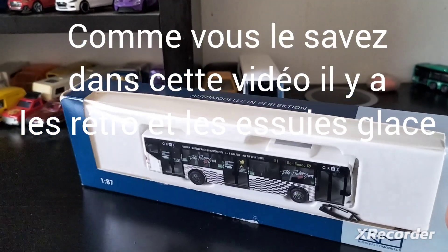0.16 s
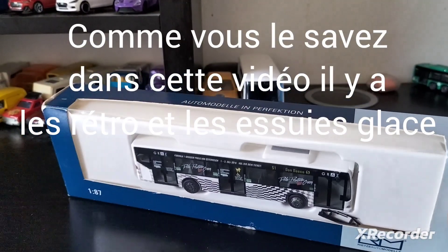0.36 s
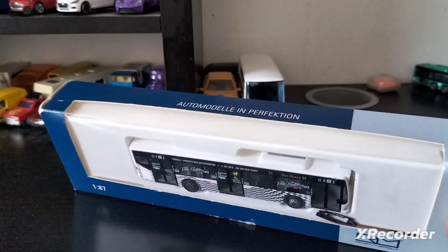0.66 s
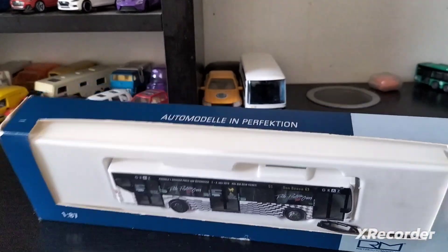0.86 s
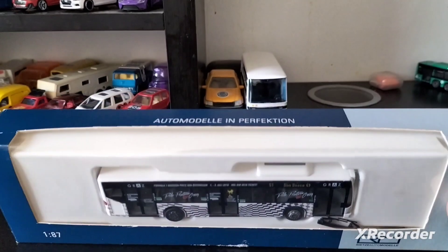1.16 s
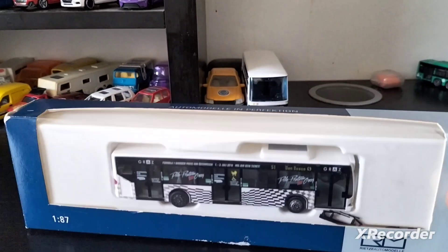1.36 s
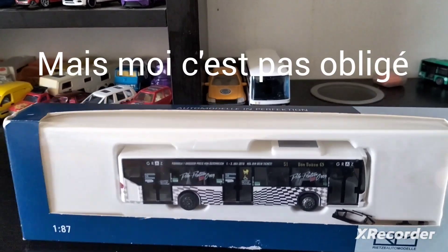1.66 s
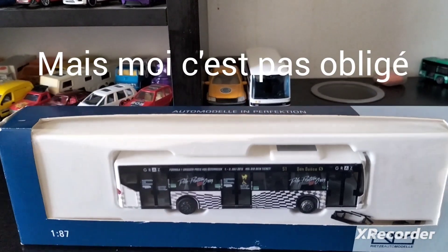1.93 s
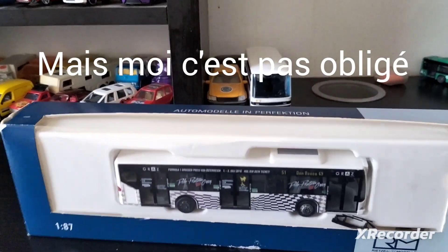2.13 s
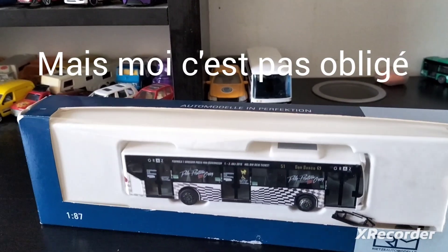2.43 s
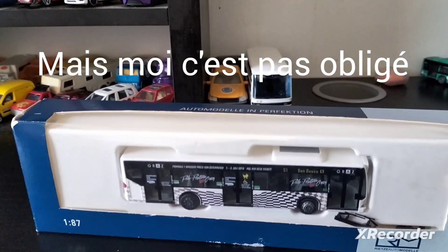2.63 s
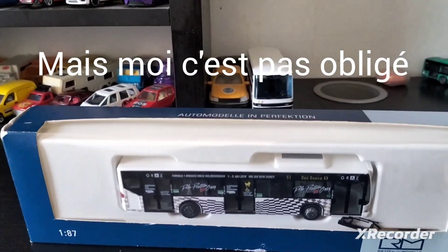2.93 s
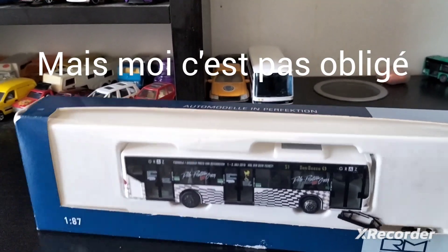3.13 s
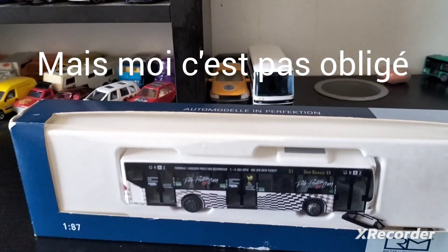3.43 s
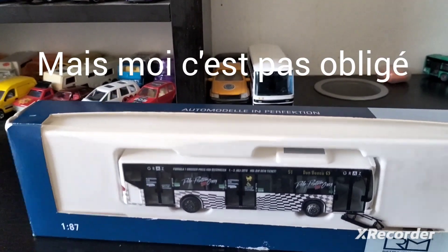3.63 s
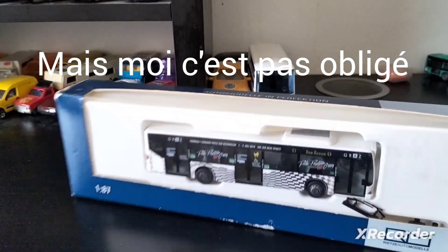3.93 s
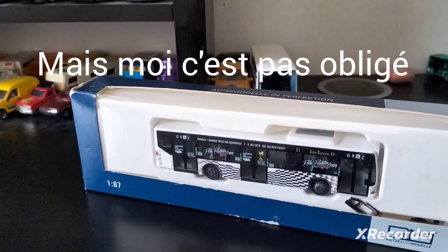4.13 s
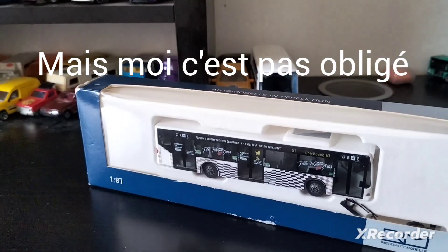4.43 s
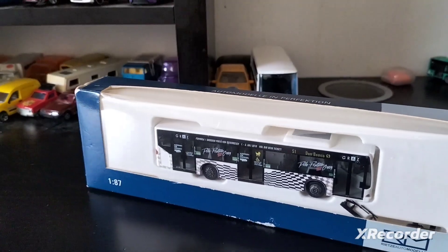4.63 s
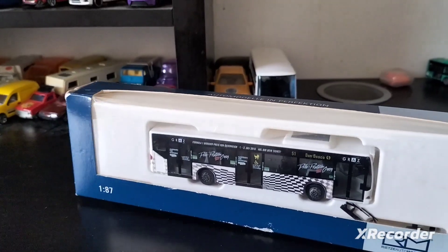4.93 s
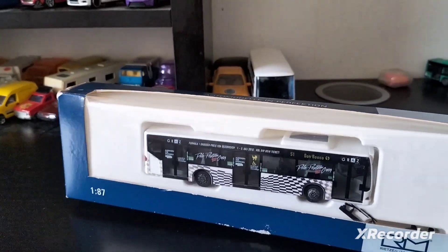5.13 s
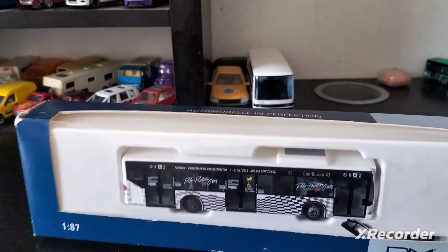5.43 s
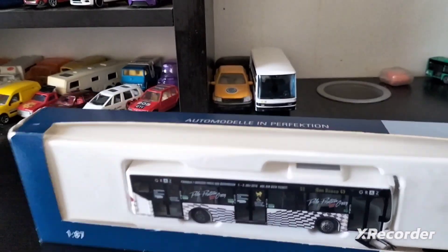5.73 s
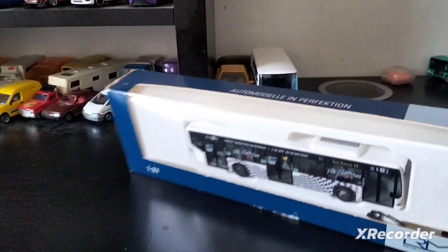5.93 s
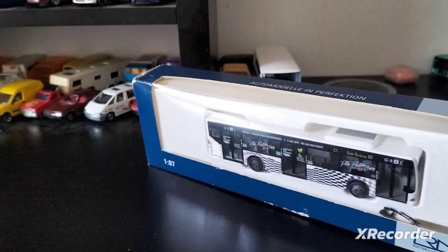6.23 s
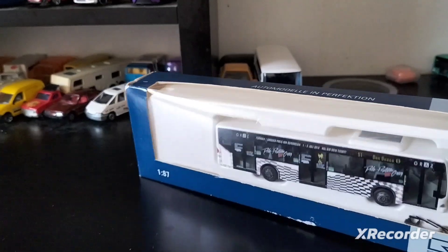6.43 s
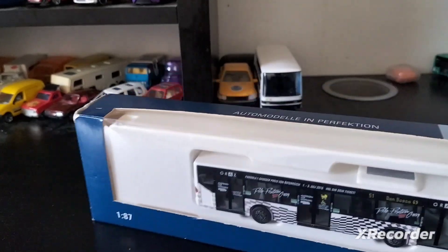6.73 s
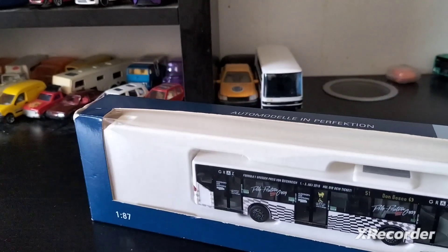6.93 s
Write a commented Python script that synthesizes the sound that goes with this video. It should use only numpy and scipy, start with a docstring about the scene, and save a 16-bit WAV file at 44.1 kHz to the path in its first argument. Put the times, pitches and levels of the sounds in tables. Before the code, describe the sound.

Close, dry handling noise: thin plastic buckles and snaps inside a hollow card box, fingers slide in short strokes, edges scuff. The snaps are strongest around the middle, thin out, then return harder. Near the end a flap lets go with a hard pop and rapid fading creak, followed by zips and a thump. Short room echo, faint room tone, quiet gaps nearly silent.

```python
"""In a small room, a cardboard toy box with a thin plastic insert is handled close to a phone.
The insert snaps and crackles as it flexes, with small bright ticks and clicks: noise and tones that die away.
Card edges scuff and a plastic edge zips in dense runs of tiny slips, with a few dull knocks;
one flap creaks as a row of short pulses, and between them fingers and insert slide over the card.
The box's resonances colour the snaps, scuffs and sliding; a short room echo and faint room tone lie behind."""
import sys
import numpy as np
from scipy import signal
from scipy.fft import rfft, irfft, next_fast_len
from scipy.io import wavfile
from scipy.ndimage import uniform_filter1d, map_coordinates

SR = 44100
rng = np.random.default_rng(int(sys.argv[2]) if len(sys.argv) > 2 else 0)


def waveform_to_disk(signal):
    """Save audio, clipped to [-1, 1], as 16-bit WAV at the path in sys.argv[1]."""
    frames = np.transpose(np.atleast_2d(signal))
    scaled = np.clip(frames, -1, 1) * 32767
    samples = np.round(scaled).astype(np.int16)
    wavfile.write(sys.argv[1], SR, samples)


N = 312228

# the four registers, in order bass, middle, upper, treble: (lowest f/Hz, highest f/Hz)
BANDS = [(20, 550), (550, 1800), (1800, 4500), (4500, 18000)]

# Every snap, scuff and stroke has a level (of its middle register), a body (bass over middle)
# and a brightness (upper register over middle).


def snaps(wall_db=9, tone_db=-15, tone_t60=0.062, ring_t60=0.045, bass_t60=0.087, attack_s=0.0015,
          crackle_db=-20, crackle_t60=0.21):
    """A panel strains, buckles and settles: a brief crunch, many damped modes with one panel tone, then crackle."""
    # sharp snaps of card and insert, though the one at 5.376 s is rather a short scuff: (t/s, level/dB,
    # body/dB, brightness/dB, ringing panel f/Hz)
    snap_list = [(0.076, -52, -18, -2, 1130), (0.111, -53.5, -11, -1, 990), (0.226, -43, -1.5, -8.5, 654),
                 (0.483, -55, -15, -3.5, 1038), (0.646, -62, 0, 1.5, 610), (0.87, -39, -14, -6, 1008),
                 (0.957, -40.5, -10, 4.5, 977), (1.048, -28, -7.5, 8.5, 755), (1.218, -48, -23, -5.5, 1130),
                 (1.297, -54, -17, -9.5, 1093), (1.699, -39, -15, -6.5, 1326),
                 (1.745, -39.5, -5.5, -2, 1005), (1.832, -40.5, -22, -3, 810),
                 (1.869, -43.5, -38, -1, 1030), (1.989, -28.5, -6, -3, 665), (2.079, -34, -14, -3, 1018),
                 (2.142, -35, -15, 0.5, 1540), (2.303, -19.5, -14, -2, 690),
                 (2.447, -39, -15.5, -3.5, 1043), (2.504, -44, -8, -8.5, 990),
                 (2.618, -33, -15.5, -7.5, 957), (2.801, -30.5, -6.5, -3.5, 668),
                 (3.089, -22, -4, -12, 960), (3.278, -45, -19.5, -6.5, 1015),
                 (3.427, -59.5, -10, 0.5, 1014), (3.589, -39.5, -7, -9.5, 1085),
                 (3.884, -33.5, -10, -2, 683), (3.905, -26.5, -6, -18.5, 658), (4.066, -35, -12, 3.5, 1190),
                 (4.107, -29, -14.5, 1.5, 1242), (4.249, -53.5, -14.5, 6.5, 1716),
                 (4.646, -46.5, -15, -4, 1497), (4.743, -37.5, -6, -1.5, 418),
                 (5.087, -60.5, -8.5, 4.5, 975), (5.376, -43.5, -14.5, 0, 893), (5.85, -20, -7, -5.5, 1250),
                 (5.908, -32.5, -6, -4, 995), (6.141, -21, -10.5, 2, 1700), (6.511, -32, -9.5, 3.5, 1650)]
    lead_db, lead_rise_s = -20, 0.003  # straining just before the snap
    crack_db, crack_t60 = 2, 0.0045  # the first instant of a snap
    attack_per_body, typical_body_db = 1.3, -10  # a broad contact lands more slowly than a pointed one
    out = np.zeros(N)
    t = np.arange(-SR // 40, SR // 5) / SR
    after = np.maximum(t, 0)
    for s, db, body_db, bright_db, hz in snap_list:
        dense, bass = rng.standard_normal((2, len(t)))
        ring = band(dense, (550, 18000)) * fade(after, ring_t60)
        ring += band(bass, BANDS[0]) * fade(after, bass_t60)
        ring += amp(tone_db) * np.sin(2 * np.pi * hz * t) * fade(after, tone_t60)
        ring += amp(crack_db) * dense * fade(after, crack_t60)
        landing_s = attack_s * amp(attack_per_body * (body_db - typical_body_db))
        ring *= 1 - np.exp(-after / landing_s)
        before = amp(lead_db) * np.exp(-np.abs(t) / lead_rise_s)
        settling = amp(crackle_db) * fade(after, crackle_t60)
        ring += np.where(t < 0, before, settling) * grains(len(t), rate=680, spread_db=5)
        ring = coloured(ring, lambda f: contact(f, bright_db) + wall_db * walls(f, vary=13.5))
        snap = amp(db) * voiced(ring, registers(body_db, bright_db), window_size=882)
        add(out, s + t[0] + lead_rise_s * 2 / 3, snap)  # the snap breaks 2 ms after its listed time
    return out


def scuffs(wall_db=8):
    """An edge drags or a panel is knocked: a dense run of tiny slips swells and dies."""
    # short scuffs and a few dull knocks: (t/s of the swell's top, level/dB, body/dB, brightness/dB, rise/s)
    scuff_list = [(0.054, -57, 1.5, 4.5, 0.0065), (0.269, -56.5, 3.5, -3.5, 0.016),
                  (0.435, -61.5, 0.5, -25, 0.015), (0.597, -44.5, -4, -12, 0.013),
                  (0.752, -52.5, -1, -18, 0.0089), (0.928, -44.5, -10, -3.5, 0.007),
                  (0.986, -34, 0, -21, 0.0064), (1.047, -28, -4.5, 2, 0.018), (1.16, -36, -7.5, -8, 0.0051),
                  (1.535, -46, -6.5, -3.5, 0.006), (2.155, -46, -16, 2, 0.019),
                  (2.25, -47, -8, -3.5, 0.023), (2.669, -33.5, -14, -4, 0.002),
                  (2.832, -47, -5, -7.5, 0.003), (3.147, -39.5, -14, -14.5, 0.0024),
                  (3.626, -46, -3, -5.5, 0.0051), (4.15, -28.5, 0, -7.5, 0.0082),
                  (4.401, -47.5, -10, -0.5, 0.024), (4.528, -58.5, -3.5, 0.5, 0.044),
                  (4.995, -52, -10, -5, 0.0048), (5.034, -56, -2.5, -6.5, 0.0088),
                  (5.276, -47, -10, 4, 0.014), (5.507, -51, -32, -14, 0.0034),
                  (5.605, -50, -9.5, -10, 0.015), (5.861, -26, -12, -2.5, 0.0015),
                  (5.983, -30, -13, 2.5, 0.014), (6.011, -48, -4, -4, 0.0027),
                  (6.088, -34.5, -16, -6, 0.008), (6.412, -25.5, -21, -5, 0.0052),
                  (6.522, -33, -12, -2.5, 0.01), (6.616, -29, -19, 5.5, 0.0041),
                  (6.658, -21, -0.5, -7, 0.0032), (6.729, -40.5, -6, -3, 0.004),
                  (6.85, -33, 1, -8.5, 0.0064)]
    shortest_fall_s, fall_per_rise = 0.009, 1  # each dies quickly, a slow one a little later
    out = np.zeros(N)
    t = np.arange(-SR // 10, SR // 5) / SR
    for s, db, body_db, bright_db, rise in scuff_list:
        fall = shortest_fall_s + fall_per_rise * rise
        swell = np.exp(-np.abs(t) / np.maximum(np.where(t < 0, rise, fall), 1e-3))
        rasp = swell * grains(len(t), rate=5000, spread_db=0.5)
        rasp = coloured(rasp, lambda f: contact(f, bright_db) + wall_db * walls(f, vary=10.0))
        add(out, s + t[0], amp(db) * voiced(rasp, registers(body_db, bright_db), window_size=441))
    return out


def zips(rise_s=0.002, fall_s=0.013):
    """Very fine, fast slips along a plastic edge: a short sizzle, mostly high above the box's resonances."""
    # a sharp plastic edge zips over the card: (t/s of the top, level/dB)
    zip_list = [(1.05, -39.5), (6.595, -44.5), (6.612, -33.5)]
    # colour of the sizzle: (f/Hz, relative level/dB)
    sizzle_curve = [(2000, -30.5), (5000, -2.5), (7500, 0), (10000, -9.5), (12500, -4.5), (15500, -5)]
    out = np.zeros(N)
    t = np.arange(-SR // 50, SR // 10) / SR
    swell = np.exp(-np.abs(t) / np.where(t < 0, rise_s, fall_s))
    for s, db in zip_list:
        fine_slips = grains(len(t), rate=9000, spread_db=0.5)
        sizzle = unit(coloured(fine_slips, lambda f: along(sizzle_curve, f)))
        add(out, s + t[0], amp(db) * swell * sizzle)
    return out


def pings(t60=0.014, spread=0.16, attack_s=0.0003):
    """A small bright tick: 14 high tones scattered around a centre, dying quickly."""
    # small bright ticks and clicks, some perhaps of the plastic insert: (t/s, peak level/dB, centre f/Hz)
    ping_list = [(0.037, -41.5, 4240), (.05, -37, 4120), (0.079, -38, 4070), (0.112, -41, 3800),
                 (.648, -40.5, 4870), (4.748, -26.5, 5660), (4.812, -42.5, 4210), (5.08, -44, 4500),
                 (5.091, -38.5, 4730), (5.104, -46, 4230), (6.39, -17, 4030)]
    out = np.zeros(N)
    t = np.arange(SR // 20) / SR
    for s, db, hz in ping_list:
        pitches = hz * (1 + spread * rng.standard_normal(size=(14, 1)))
        start_phases = rng.random(pitches.shape)
        ring = np.sin(2 * np.pi * (pitches * t + start_phases)).sum(axis=0) * fade(t, t60)
        ring *= 1 - np.exp(-t / attack_s)
        add(out, s, amp(db) * ring / np.abs(ring).max())
    return out


def creak(first_db=-3, slips_db=-21, width_s=0.00073):
    """A flap sticks and slips: it lets go with one hard pop, then judders along the wall in fading slips."""
    # the one creak: t/s, slips per second, f/Hz, fade time constant/s
    s, rate, hz, life = (6.409, 300, 1364, 0.099)
    t = np.arange(-SR // 200, SR // 200) / SR

    def pulse(pitch):
        """One slip: a few swings of a tone under a smooth bump."""
        return np.cos(2 * np.pi * pitch * t) * np.exp(-(t / width_s) ** 2)

    out = np.zeros(N)
    start = s + t[0] + width_s
    add(out, start, amp(first_db) * pulse(hz))
    for delay in np.cumsum(1 + 0.13 * rng.standard_normal(size=20)) / rate:
        strength = amp(slips_db + rng.normal(0, 1.2)) * np.exp(-delay / life)
        add(out, start + delay, strength * pulse(hz * rng.normal(1, 0.07)))
    return out


def sliding(wall_db=4, unsteady_db=2, catch_rate=28, ticks_db=-6, patchy_db=4.0):
    """Fingers and insert rub over the card; strokes swell or fade evenly, the grip catches, single fibres tick."""
    # strokes: (start t/s, length/s, level/dB, swell over the stroke/dB, body/dB, brightness/dB)
    stroke_list = [(0.0, 0.21, -64, -7, -6, -30), (0.582, 0.13, -65, 2, -6, -14),
                   (0.873, 0.19, -47, 18, -5.5, -7), (1.065, 0.17, -52, -16, -11, -19.5),
                   (1.385, .275, -51.5, -3, -6, -1), (1.671, 0.32, -56, 7.5, -6, 0),
                   (2.022, 0.24, -49.5, 4, -7.5, -10.5), (2.72, 0.31, -68, 1.5, -5, 1.5),
                   (3.071, .14, -52, 2.5, -17.5, 0), (3.306, 0.052, -58.5, -3.5, -17, -9),
                   (3.68, 0.15, -66.5, 0, -6, -5), (3.978, 0.15, -55.5, 4.5, -13, 7.5),
                   (4.176, 0.15, -50, -22.5, -7.5, -7.5), (4.92, .4, -66, 9, -6, 1.5),
                   (5.417, 0.24, -60.5, 9.5, -6, -3), (5.705, 0.19, -52, 2.5, -6.5, 1.5),
                   (5.913, 0.23, -46.5, 2, -13, -2.5), (6.249, 0.18, -48.5, 11, -10.5, -4),
                   (6.443, 0.26, -44.5, 5.5, -8.5, -4), (6.773, .14, -51.5, -1.5, -13, 0.5)]
    # colour of the rubbing: (f/Hz, relative level/dB)
    rub_curve = [(47, -49), (80, -21), (269, -7), (581, -14.5), (693, 0), (884, -8), (1080, 2), (1950, -10),
                 (2540, -6), (3030, -9.5), (4040, -9), (5270, -14), (7170, -14.5), (9550, -38),
                 (15500, -43.5)]
    press_s, lift_s = 0.012, 0.03  # a stroke takes hold just before its start and lets go after its end
    t = np.arange(N) / SR
    # uneven grip: random values, catch_rate of them a second, joined smoothly
    grip = map_coordinates(rng.standard_normal(int(t[-1] * catch_rate) + 4), [t * catch_rate])
    slips = grains(N, rate=4000, spread_db=0.0)
    slips += amp(ticks_db) * grains(N, rate=70, spread_db=4)
    rub = coloured(wandering(slips, patchy_db), lambda f: along(rub_curve, f) + wall_db * walls(f))
    hollow = unit(band(rub, BANDS[0]))
    card = unit(band(rub, BANDS[1]))
    hiss = unit(band(rub, (BANDS[2][0], BANDS[3][1])))
    out = np.zeros(N)
    for s, length, db, swell_db, body_db, bright_db in stroke_list:
        touching = np.clip(1 + np.minimum((t - s) / press_s, (s + length - t) / lift_s), 0, 1)
        on = touching > 0
        progress = np.clip((t[on] - s) / length, 0, 1)
        force = touching[on] * amp(db + swell_db * (progress - 0.5))
        out[on] += force * (amp(body_db) * hollow[on] + card[on] + amp(bright_db) * hiss[on])
    return amp(unsteady_db * grip) * out


def grains(size, rate, spread_db):
    """Tiny slips of the fibres at random moments (rate: average number a second) and of unequal sizes."""
    hit = rng.random(size) < rate / SR
    sizes = amp(spread_db * np.clip(rng.standard_normal(size), -2, 2))
    return unit(hit * rng.standard_normal(size) * sizes)


def wandering(x, patchy_db):
    """As the contact point travels, different panel modes take turns to speak."""
    z = signal.stft(x, nperseg=1024)[2]
    field = rng.standard_normal(z.shape)
    # random patches of louder and softer sound, smoothed over pitch (axis 0) and time (axis 1)
    broad = uniform_filter1d(uniform_filter1d(field, size=25, axis=0), size=7, axis=1)
    narrow = uniform_filter1d(uniform_filter1d(field, size=4, axis=0), size=6, axis=1)
    patches = unit(0.45 * unit(broad) + unit(narrow))
    return signal.istft(z * amp(patchy_db * patches), nperseg=1024)[1][:len(x)]


def contact(hz, bright_db):
    """Spectrum of a blow: a soft contact leans towards the low modes, a hard one towards the high."""
    # colour of a blow before the lean: (f/Hz, relative level/dB)
    strike_curve = [(30, -34), (80, -20.5), (140, -11), (300, 0), (560, 1.5), (750, 8.5), (1300, 12.5),
                    (1650, 6), (1950, -3.5), (2600, 1.5), (4000, -2), (5000, -8.5), (7300, -10),
                    (8600, -25.5), (10000, -40.5), (12000, -32.5), (15500, -32.5)]
    tilt_per_bright, flat_bright_db = 0.33, -5  # dB an octave per dB of brightness; brightness without tilt
    octaves = np.log2(np.clip(hz, BANDS[1][0], BANDS[2][1]) / BANDS[1][0])
    return along(strike_curve, hz) + tilt_per_bright * (bright_db - flat_bright_db) * octaves


def walls(hz, vary=0):
    """Humps where the box resonates; each contact drives them differently, the soft card caps their sharpness."""
    # box walls and insert: (f/Hz, width/Hz, height/dB, softened to a quarter below)
    wall_humps = [(293, 55, -5.5), (695, 100, -7.5), (1031, 150, 5.5), (2480, 79, -16.5), (3796, 200, -7),
                  (4600, 30, -22.5), (7050, 100, -21)]
    # low resonances of the hollow box: (f/Hz, width/Hz, height/dB, softened to a quarter below)
    hollow_humps = [(129, 39, -3), (150, 35, -8), (431, 28, -6)]
    total = 0
    for centre, width, height in [*hollow_humps, *wall_humps]:
        driven = amp((height + vary * rng.standard_normal()) / 4)
        total = total + driven / (1 + ((hz - centre) / (width / 2)) ** 2)
    return np.minimum(total, 1)


def registers(body_db, bright_db):
    """Levels of bass, middle, upper register and treble: a broad contact adds body, a hard one brightness."""
    treble_per_bright, treble_db = 0.97, -7.5  # the treble of every blow follows its upper register
    return body_db, 0, bright_db, treble_per_bright * bright_db + treble_db


def voiced(x, levels_db, window_size):
    """Set each register's level over its loudest moment: where the box is touched decides its colour."""
    out = 0
    for edges, db in zip(BANDS, levels_db):
        part = band(x, edges)
        loudest = np.sqrt(uniform_filter1d(part * part, window_size).max() + 1e-20)
        out = out + amp(db) * part / loudest
    return out


def room(x):
    """The small room answers with a short fading tail; a fresh random tail is drawn three times a second."""
    # how long the tail takes to fall by 60 dB: (f/Hz, t60/s)
    tail_times = [(150, 0.12), (400, 0.29), (1000, 0.42), (3000, 0.26), (7500, 0.3), (15000, 0.4)]
    out = np.zeros(N)
    for i in range(0, N, SR // 3):
        hz, t, z = signal.stft(rng.standard_normal(SR // 2), SR, nperseg=256)
        fading = z * fade(t, along(tail_times, hz)[:, None])
        tail = signal.istft(fading, SR, nperseg=256)[1]
        tail *= 1 - np.exp(-np.arange(len(tail)) / SR / 0.00096)  # reflections build up
        add(out, i / SR, signal.fftconvolve(x[i:i + SR // 3], tail / np.linalg.norm(tail)))
    return out


def room_tone():
    """The faint steady noise of the room: random noise shaped by a fixed colour."""
    # colour of the room tone: (f/Hz, relative level/dB)
    tone_curve = [(15, -54.5), (25, -23), (267, -2.5), (848, -10.5), (1020, -5), (1950, -16.5), (2560, -12),
                  (7100, -19), (9300, -48), (15500, -46.5)]
    return unit(coloured(rng.standard_normal(N), lambda f: along(tone_curve, f)))


def amp(db):
    """Decibels to gain."""
    return 10 ** (np.asarray(db) / 20)


def unit(x):
    """Scale to an rms (average strength) of 1."""
    return x / np.sqrt(np.mean(x ** 2) + 1e-20)


def along(points, hz):
    """Read a curve of (f/Hz, value) points, joined by straight lines on a log frequency axis."""
    f, v = np.transpose(points)
    return np.interp(np.log(hz + 1), np.log(f + 1), v)


def fade(t, t60):
    """Exponential decay that falls by 60 dB in t60 seconds."""
    return np.exp(-np.log(1000) * t / np.maximum(t60, 1e-3))


def add(track, s, x):
    """Mix x into the track at s seconds, cutting off what lies outside."""
    i = round(s * SR)
    x, i = x[max(-i, 0):], max(i, 0)
    track[i:i + len(x)] += x[:max(len(track) - i, 0)]


def coloured(x, db_of_hz):
    """Filter with the given gain curve that never sounds ahead of its input (minimum phase)."""
    m = 2 * next_fast_len(x.shape[-1] // 2 + 2048)
    gain = amp(db_of_hz(np.fft.rfftfreq(m, 1 / SR)))
    cepstrum = irfft(np.log(gain + 1e-6), m)
    # folding the second half onto the first makes the filter respond as early as it can
    cepstrum[1:m // 2] *= 2
    cepstrum[m // 2 + 1:] = 0
    return irfft(rfft(x, m) * np.exp(rfft(cepstrum)), m)[..., :x.shape[-1]]


def band(x, edges):
    """Keep only the frequencies between two edges."""
    return signal.sosfilt(signal.butter(3, edges, 'bandpass', fs=SR, output='sos'), x)


def scene(room_db=-10, quiet_db=-72):
    """Box, room and room tone reach one microphone, heard alike on both channels."""
    box = snaps() + scuffs() + zips() + pings() + creak() + sliding()
    mono = box + amp(room_db) * room(box) + amp(quiet_db) * room_tone()
    return np.array([mono, mono])


def record(dry, threshold_db=-64, depth_db=-10, top_hz=15800):
    """The phone's noise suppressor turns the quietest moments down; nothing passes above its band limit."""
    power = np.abs(uniform_filter1d(dry[0] ** 2, size=882))  # averaged over 20 ms
    gain = amp(depth_db / (1 + power / amp(threshold_db) ** 2))
    m = next_fast_len(N + SR // 2)
    passed = np.fft.rfftfreq(m, 1 / SR) < top_hz
    return irfft(rfft(dry * gain, m) * passed, m)[:, :N]


dry = scene()
out = record(dry)
waveform_to_disk(out)
```